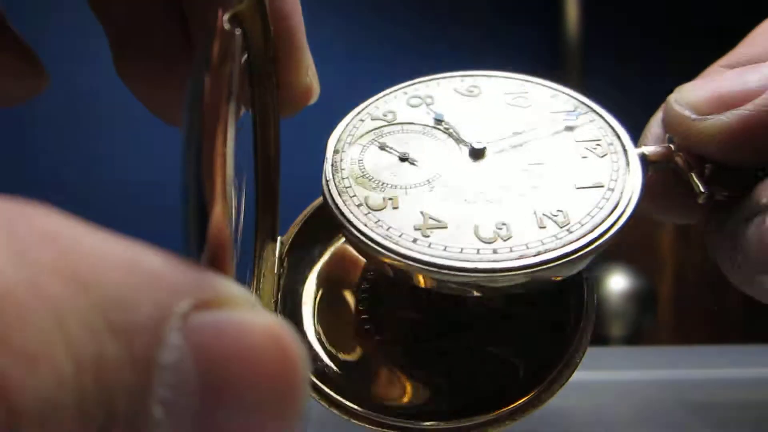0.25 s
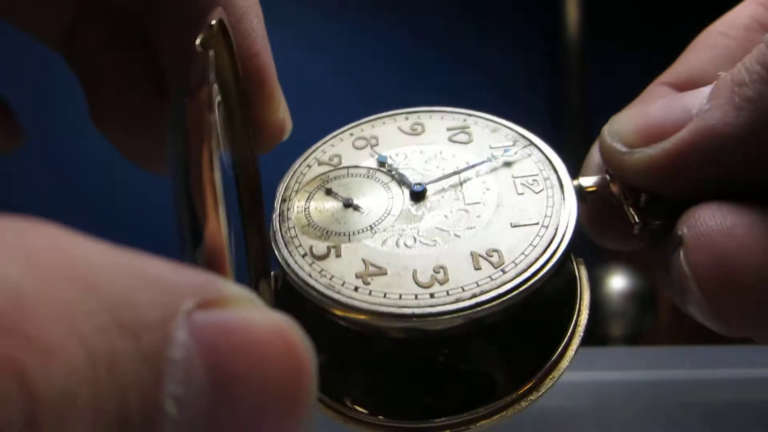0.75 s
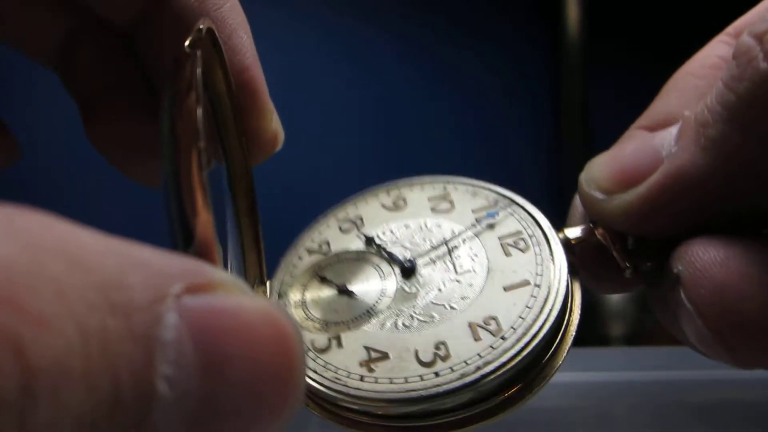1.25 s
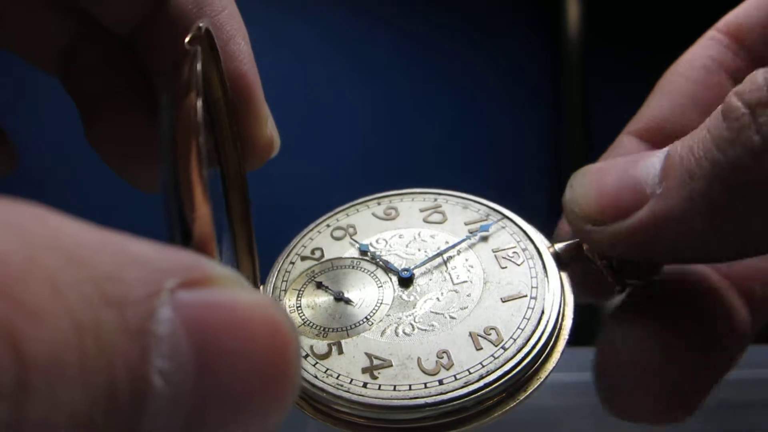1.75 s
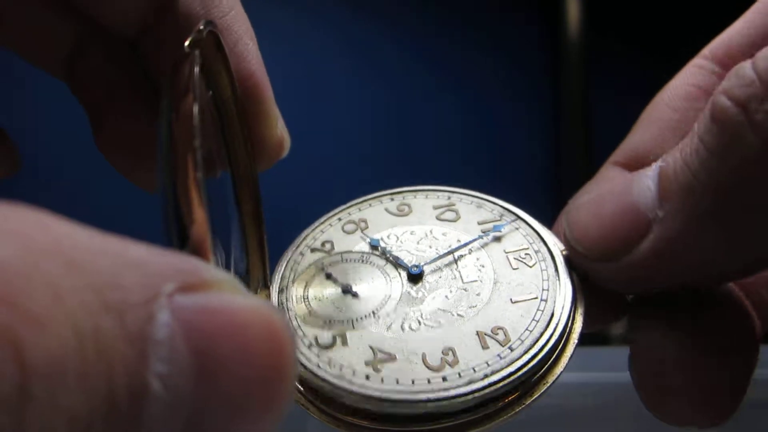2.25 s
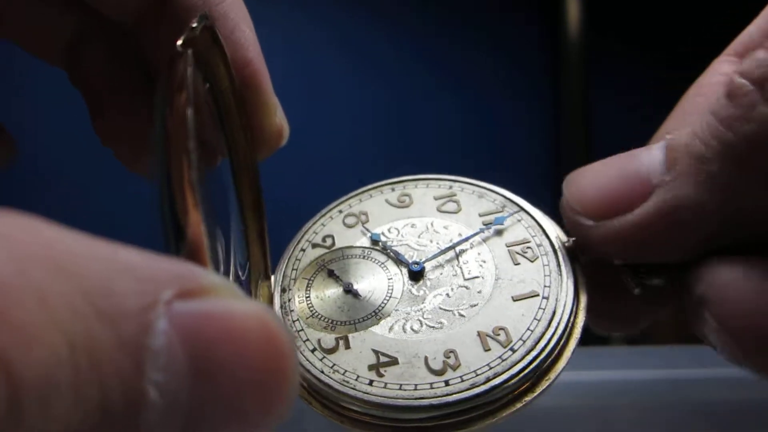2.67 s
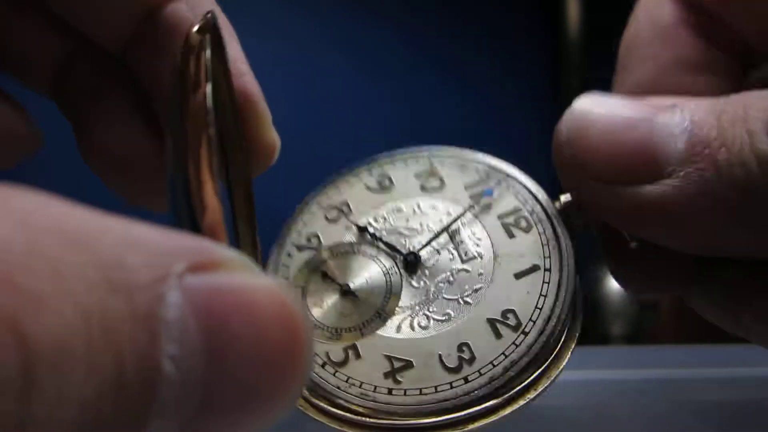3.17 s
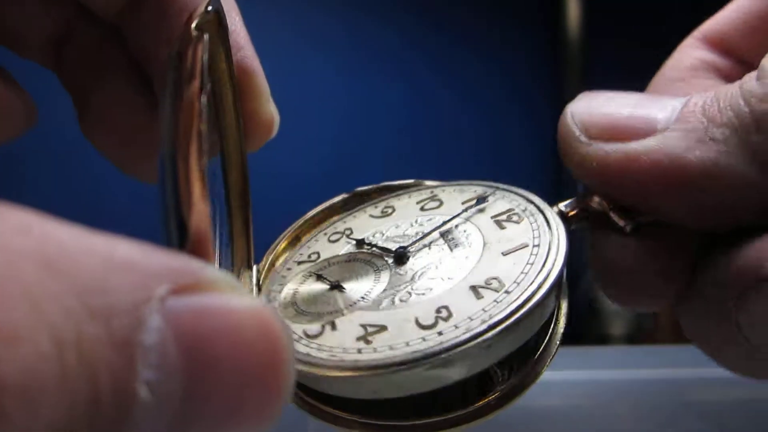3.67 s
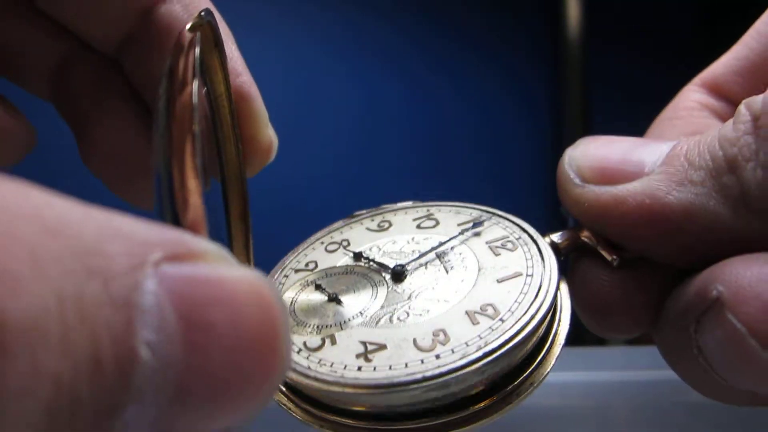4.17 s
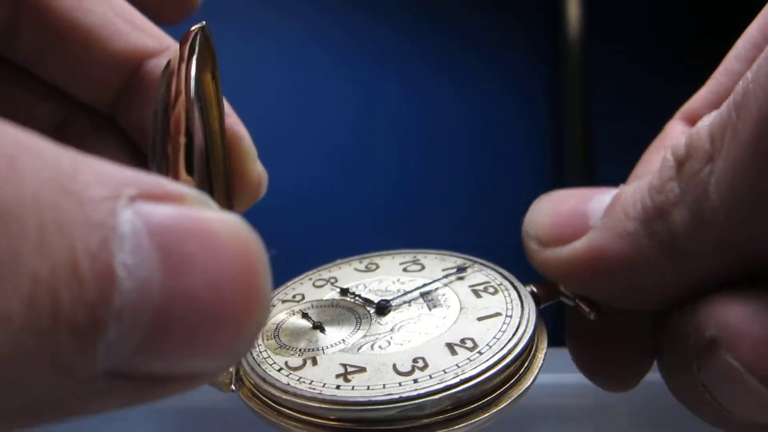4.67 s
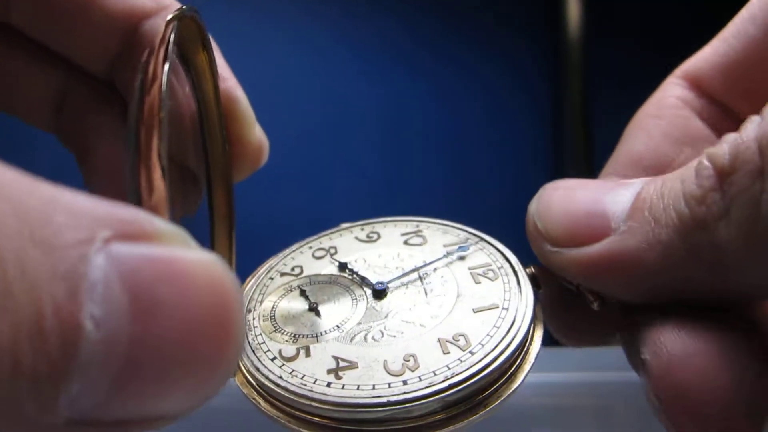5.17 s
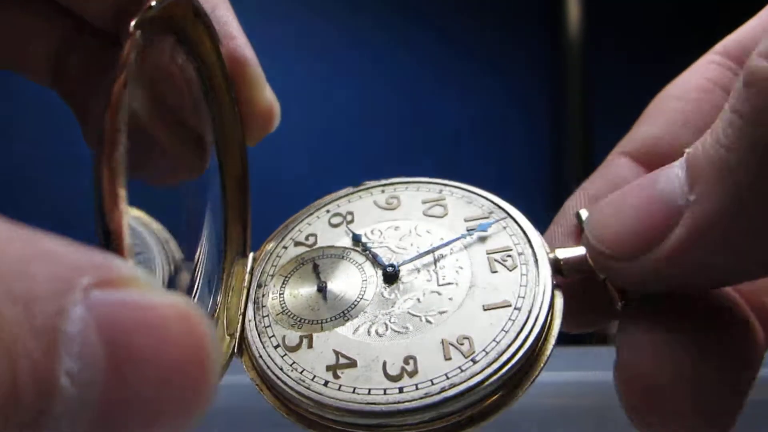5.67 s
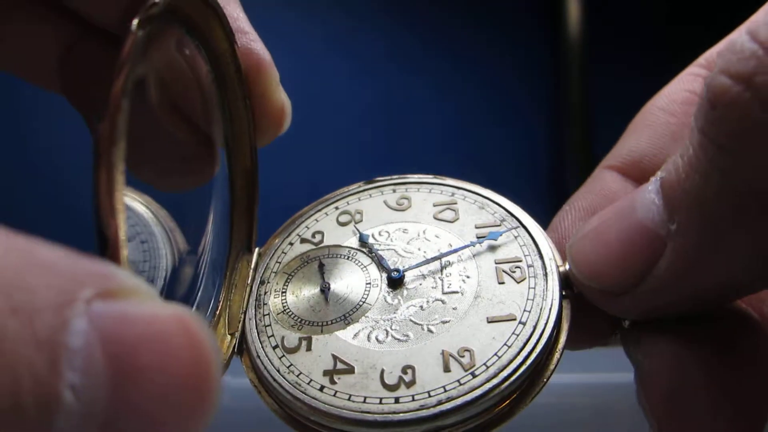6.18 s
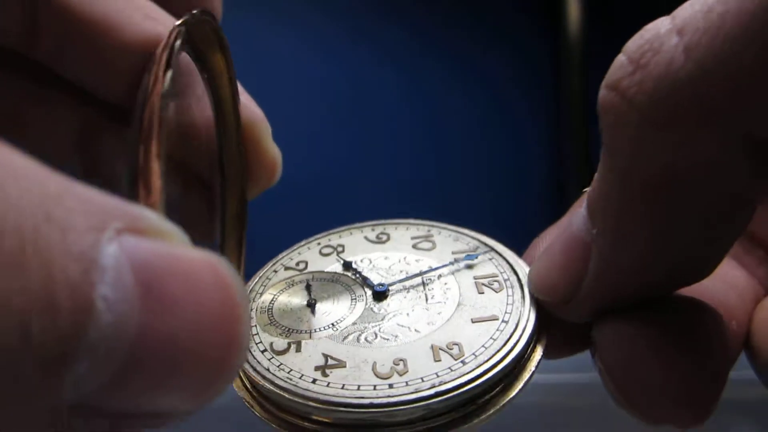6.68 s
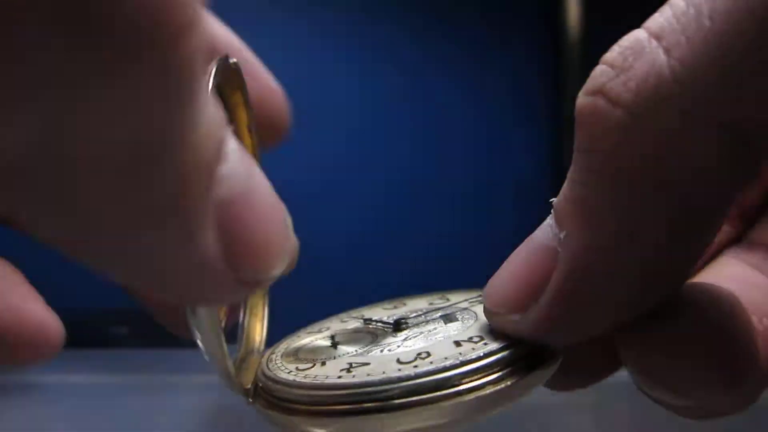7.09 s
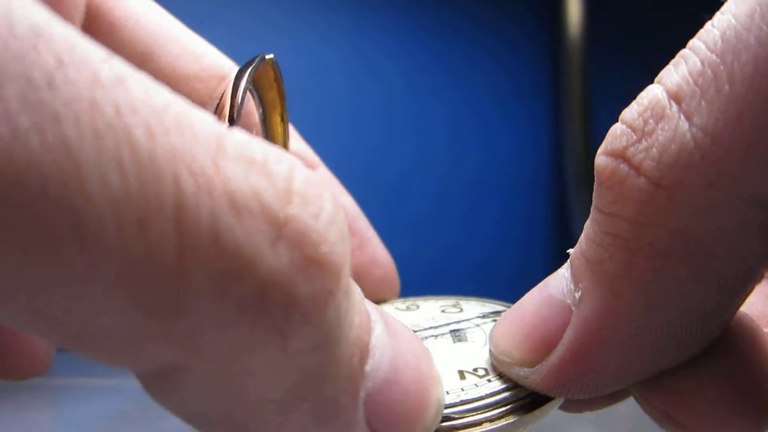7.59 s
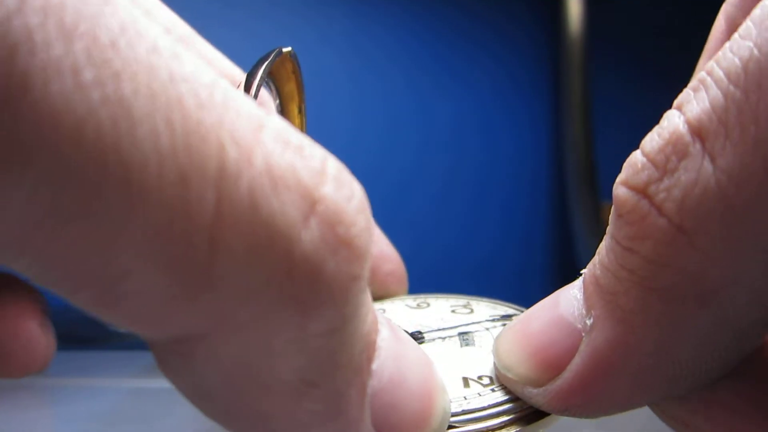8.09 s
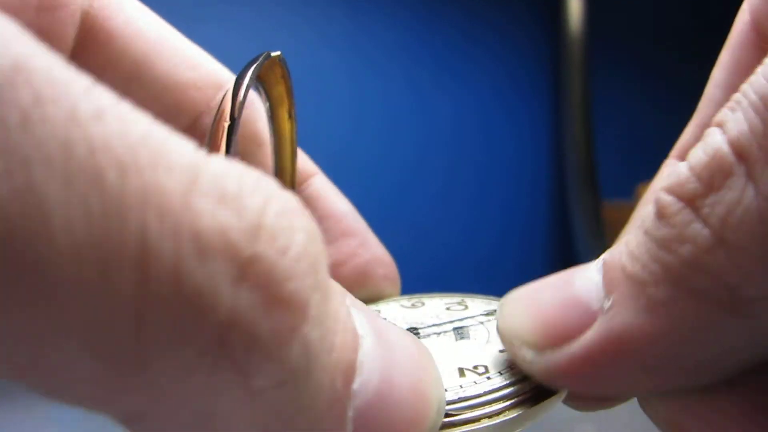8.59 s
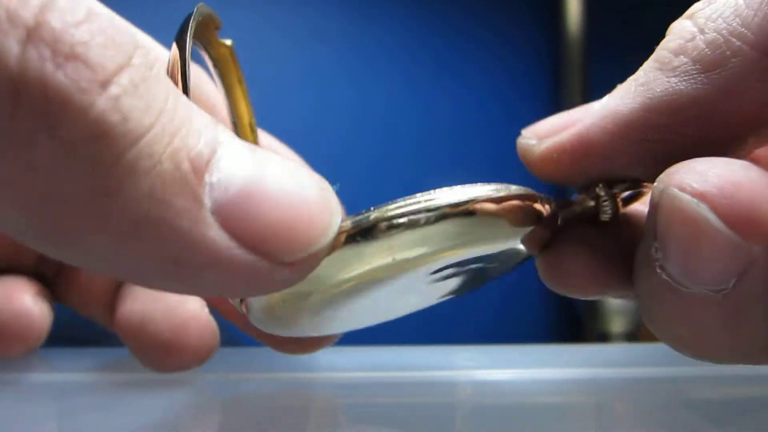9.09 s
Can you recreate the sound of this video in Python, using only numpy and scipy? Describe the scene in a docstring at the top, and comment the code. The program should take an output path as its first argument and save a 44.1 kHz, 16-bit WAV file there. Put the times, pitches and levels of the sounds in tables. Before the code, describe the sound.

A pocket watch ticks fast and faintly while its movement clinks, scrapes and snaps into a metal case, close up in a quiet room.

```python
"""A ticking watch movement knocks and scrapes on the rim of its open metal case as fingers lower it in.
Close to a camera microphone in a quiet room: blows ring modes of table, case, rim and lid, with noise cracks;
slides are dense tiny slips on the same metal, ticks are bursts of small impacts, skin rubs as shaped noise.
Short reflections, room air, rumble, hum and faint whines lie around it, with one thin squeak late on.
The camera ducks its gain after loud blows and twice falls nearly silent around a small dull click."""
import sys
import numpy as np
from scipy import signal
from scipy.fft import rfft, irfft
from scipy.io import wavfile
from scipy.ndimage import uniform_filter1d

SR = 44100
rng = np.random.default_rng(int(sys.argv[2]) if len(sys.argv) > 2 else 0)


def store_wav(level_fs):
    """Save 16-bit WAV to argv[1]."""
    pcm = np.round(np.clip(np.atleast_2d(level_fs), -1, 1) * 32767)
    wavfile.write(sys.argv[1], SR, pcm.T.astype(np.int16))


N = 411453

# ringing modes of the table top: (f/Hz, level/dB, t60/s)
TABLE_MODES = [(152, -10, 0.037), (184.4, -7, 0.06), (240.3, 4.5, 0.036), (372, -2.5, .04)]
# ringing modes of the metal case: (f/Hz, level/dB, t60/s)
CASE_MODES = [(488, -3.5, 0.01), (588, 3, 0.021), (710.4, 1.5, 0.032), (919, 6.5, 0.015),
              (1084, 9.5, 0.012), (1254, 3.5, 0.014), (1584, -6, 0.023)]
# ringing modes of the case rim: (f/Hz, level/dB, t60/s)
RIM_MODES = [(2131, 1.5, 0.011), (2330, 1.5, 0.012), (2644, -1, 0.011), (3450, -0.5, 0.014),
             (3604, -3.5, 0.017), (4040, -0.5, 0.01), (4830, 2.5, 0.0058)]
# highest ringing modes, at the edge of the rim: (f/Hz, level/dB, t60/s)
EDGE_MODES = [(5920, 1, 0.0031), (6680, 1.5, 0.013), (8380, -3, 0.017), (11420, -5, 0.011),
              (12500, -7, 0.01), (14350, -12.5, 0.0067)]
# ringing modes of the loosely held lid: (f/Hz, level/dB, t60/s)
LID_MODES = [(2190, -5, .09), (3200, -2, .08), (3540, 0, .06), (3960, -3, .09), (4130, -1, .09),
             (5900, -9, .04), (6790, -1, .13), (8570, -6, .045), (10560, -8, .13), (14900, -14, .09)]


def gain_of(db):
    """Decibels to gain."""
    return 10 ** (np.asarray(db) / 20)


def evened(x):
    """Scales to rms 1."""
    return x / np.sqrt(np.mean(x ** 2) + 1e-20)


def read(points, hz):
    """A table over frequency, read on a log frequency axis."""
    f, value = np.transpose(points)
    return np.interp(np.log(hz + 1), np.log(f + 1), value)


def follow(points, s):
    """A table over time, read at s seconds."""
    return np.interp(s, *np.transpose(points))


def add(mix, s, sound):
    """Mixes a sound in at s seconds."""
    part = mix[round(s * SR):][:len(sound)]
    part += sound[:len(part)]


def noise(spectrum, patchy_db=0.):
    """Noise of rms 1 with a given spectrum and patches that drift over time and frequency."""
    frames, hz = N // 256 + 5, np.fft.rfftfreq(1024, 1 / SR)
    real, imaginary, patches = rng.standard_normal((frames, 513, 3)).T
    patches = uniform_filter1d(patches, size=10, axis=0)
    patches = evened(uniform_filter1d(patches, size=12, axis=1))
    level_db = read(spectrum, hz)[:, None] + patchy_db * patches
    z = (real + 1j * imaginary) * gain_of(level_db)
    return evened(signal.istft(z, nperseg=1024, noverlap=768)[1][:N])


def band_noise(band_hz):
    """Noise of rms 1 between two frequencies."""
    band = signal.butter(2, band_hz, "band", fs=SR, output="sos")
    return evened(signal.sosfilt(band, rng.standard_normal(N)))


def puff(spectrum, t60, rise_s=0.000074):
    """A dying burst of coloured noise, of peak 1."""
    t = np.arange(4096) / SR
    colour = gain_of(read(spectrum + [(SR / 2, -60)], np.fft.rfftfreq(4096, 1 / SR)))
    x = irfft(rfft(rng.standard_normal(4096)) * colour)
    x *= gain_of(-60 * t / t60) * (1 - np.exp(-t / rise_s))
    return x / abs(x).max()


def ring(modes, favoured_hz=None, focus=.3, spread_db=3.5, rise_s=0.00076, most_db=11.5):
    """Dying modes of peak 1; the point of contact favours those near one pitch."""
    hz, db, t60 = np.transpose(modes)[:, :, None]
    t = np.arange(round(min(t60.max(), .2) * SR)) / SR
    level_chance, pitch_chance = rng.standard_normal((2, len(modes), 1))
    if favoured_hz:
        # 20 dB lost per `focus` of log-pitch distance, up to most_db
        db = db - np.minimum(20 * abs(np.log(hz / favoured_hz)) / focus, most_db)
    level = gain_of(db + spread_db * level_chance - 60 * t / t60)
    tones = level * np.sin(2 * np.pi * hz * (1 + 0.0049 * pitch_chance) * t)
    sound = tones.sum(axis=0) * (1 - np.exp(-t / rise_s))
    return sound / abs(sound).max()


def strokes(rows):
    """Pressure and brightness gains of strokes that rise, swell or fade evenly, and fall; one held control."""
    out = np.zeros((3, N))
    edge_s = 0.021  # rise and fall, shorter only when the stroke is too brief
    for s, length_s, pressure_db, change_db, bright_db, control, *_ in rows:
        t = np.arange(0, length_s, 1 / SR)
        edge = signal.windows.tukey(len(t), min(1, 2 * edge_s / length_s))
        pressure = gain_of(pressure_db + change_db * t / length_s) * edge
        add(out[0], s, pressure)
        add(out[1], s, gain_of(bright_db) * pressure)
        out[2, round(s * SR):] = control
    return out


def room():
    """Nearly steady room air, a wandering low rumble and hum, a fuzzy drone and the camera's faint whines."""
    # spectrum of the room air: (f/Hz, relative level per Hz/dB)
    air = [(12, -38.5), (20, -14.5), (130, -2), (182, -5.5), (284, -9), (920, -14.5), (1090, -10.5),
           (1700, -20), (7270, -27.5), (15800, -34.5)]
    # steep upper band limit of the hiss: (f/Hz, relative level per Hz/dB)
    hiss_limit = [(16050, -38), (16250, -62)]
    # wandering low rumble: (t/s, level/dB)
    rumble_db = [(0, -60.5), (2.4, -56.5), (3.3, -65), (4.2, -58), (4.6, -67), (5.2, -59), (5.9, -73.5),
                 (7, -62), (8.3, -69.5), (8.8, -59), (9.33, -66)]
    # wandering hum: (t/s, level/dB)
    hum_db = [(0, -65), (1.5, -63), (2.3, -65), (2.9, -60), (3.5, -73), (4.3, -61.5), (5.25, -61),
              (5.7, -66.5), (6.9, -58), (7.9, -59.5), (8.37, -54), (8.8, -57.5), (9.33, -58.5)]
    # one fuzzy tone in the room: (f/Hz, width/Hz, level/dB)
    drone = (1085, 78, -70.5)
    # steady tones of the camera: (f/Hz, level/dB)
    whines = [(7854, -83), (7881, -76)]
    t = np.arange(N) / SR
    out = gain_of(-54) * noise(air + hiss_limit, patchy_db=0.23)
    out += gain_of(follow(rumble_db, t)) * band_noise([45, 95])
    out += gain_of(follow(hum_db, t)) * band_noise([110, 150])
    hz, width_hz, db = drone
    narrow = signal.iirpeak(hz, hz / width_hz, SR)
    out += gain_of(db) * evened(signal.lfilter(*narrow, rng.standard_normal(N)))
    for hz, db in whines:
        out += gain_of(db) * np.sqrt(2) * np.sin(2 * np.pi * (hz * t + rng.random()))
    return out


def burst(hz, length_s, count):
    """A few tiny escapement impacts in quick succession, the first at once and strongest."""
    # ringing modes of the escapement: (f/Hz, level/dB, t60/s)
    escapement = [(7100, -7.5, 0.0049), (8200, 11, 0.0069), (9300, -11.5, 0.019), (9300, 3, 0.011),
                  (10500, 4, 0.01), (11300, 1.5, 0.0068), (14080, 4.5, 0.0055), (14420, -5, 0.0048),
                  (16110, -4, 0.0065)]
    # noise of one impact: (f/Hz, relative level per Hz/dB)
    hiss = [(5000, -7.5), (8000, 0.5), (11000, -9.5), (15000, 4), (16500, -15)]
    at, size = rng.random((2, count))
    train = np.zeros(round(length_s * SR) + 2)
    places = np.round((np.arange(count) + at) / count * length_s * SR).astype(int)
    train[places] = 0.39 + 0.31 * size
    train[0] = 1
    impact = gain_of(-1.0) * puff(hiss, t60=0.0084)[:800]
    add(impact, 0, ring(escapement, hz, focus=0.49))
    sound = np.convolve(train, impact)
    return sound / abs(sound).max()


def ticks():
    """About five beats a second, strong and weak in turn; unlock, impulse and drop crowd into milliseconds."""
    # lag of the beat, which shifts while the movement is tilted: (t/s, lag/s)
    beat_lag = [(0, .0612), (1.7, .0635), (3, .0695), (4.8, .0705), (5.4, .0675), (6.2, .0695),
                (8.4, .0688), (9.3, .0655)]
    # the two beats in turn: (level/dB, middle of the favoured f/Hz, length/s, late/s)
    tick_tock = [(-39.5, 13500, 0.0058, 0), (-47, 10500, 0.0057, .0015)]
    spread_db, spread_octaves = 1, 0.26
    out = np.zeros(N)
    starts = np.arange(0, N / SR, .2)
    chance = rng.standard_normal((len(starts), 2))
    for k, s in enumerate(starts + follow(beat_lag, starts)):
        db, hz, length_s, late_s = tick_tock[k % 2]
        beat = burst(hz * 2 ** (spread_octaves * chance[k, 0]), length_s, count=4)
        add(out, s + late_s, gain_of(db + spread_db * chance[k, 1]) * beat)
    return out


def echo(x):
    """Short dense reflections from table and nearby walls, each frequency dying at its own rate."""
    # decay of the reflections: (f/Hz, t60/s)
    decay = [(200, 0.26), (1000, 0.2), (4000, 0.083), (12000, 0.17)]
    hz, t, z = signal.stft(rng.standard_normal(SR // 4), SR, nperseg=128)
    dying = gain_of(-60 * t / read(decay, hz)[:, None])
    tail = signal.istft(z * dying, SR, nperseg=128)[1]
    tail = np.pad(tail, (round(0.0029 * SR), 0))  # s before the first reflection
    return signal.oaconvolve(x, tail / np.linalg.norm(tail))[:N]


def knocks():
    """Each blow rings table, case, rim, edge and the loosely held lid by its own amounts."""
    # blows of the movement on the case: (t/s, table thud level/dB, case knock level/dB, rim clack level/dB,
    # snap level/dB, favoured case f/Hz, favoured rim and lid f/Hz)
    blows = [(0.9669, -24, -13, -9, -21, 1090, 4020), (1.022, -60, -32, -46, -61, 704, 3450),
             (1.052, -55, -32, -45, -62, 645, 3540), (1.0675, -45, -27, -26, -39, 704, 3600),
             (1.149, -30.5, -27, -22, -35, 714, 3600), (1.1645, -44, -40, -43, -52, 1070, 4100),
             (1.1761, -50, -27, -27, -49, 1100, 3470), (1.185, -36, -23, -30, -50, 1100, 4090),
             (1.1977, -41, -30, -48, -48, 1130, 4170), (1.214, -50, -31, -39, -56, 610, 3430),
             (1.2272, -42, -32, -36, -48, 1120, 2330), (1.241, -35, -35, -47, -53, 1080, 2300),
             (1.248, -43, -32, -30, -49, 660, 2140), (1.255, -54, -23, -38, -44, 940, 3500),
             (1.2653, -21, -12, -22.5, -19.5, 870, 3740), (1.2873, -37, -24.5, -33.5, -35, 1250, 2280),
             (1.346, -42, -40, -64, -58, 826, 2430), (1.4398, -29, -25.5, -48, -54, 690, 1910),
             (1.544, -30, -23, -44, -46, 950, 3500), (1.548, -19, -12, -34, -31, 970, 3570),
             (1.5617, -41, -13.5, -31, -39, 760, 2630), (1.7668, -39, -18, -37, -50, 480, 2310),
             (1.7795, -65, -23.5, -30.5, -31.5, 1660, 2680), (1.792, -58, -36, -38, -50, 1640, 1910),
             (1.812, -51, -44, -44, -55, 1210, 2540), (1.8409, -77, -27.5, -35, -27, 1180, 2620),
             (1.845, -67, -51, -25, -23.5, 1300, 2590), (2.01, -64, -38, -49, -58, 890, 2350),
             (2.295, -35.5, -39, -54, -59, 790, 2940), (2.4277, -27.5, -39, -47, -57, 440, 1970),
             (2.4328, -30.5, -10, -27, -30, 547, 3630), (2.4483, -27.5, -26, -31, -40, 740, 3340),
             (2.455, -35, -39, -31.5, -48, 430, 3450), (2.5668, -44, -35, -36.5, -38, 660, 2720),
             (3.04, -51, -44.5, -46.5, -50, 660, 2850), (3.1455, -51, -28, -20, -22, 1290, 3200),
             (3.1501, -24.5, -26, -12.5, -9, 1350, 4050), (3.1578, -10, -4.5, -5, -12.5, 1110, 3300),
             (3.164, -19, -20, -26, -30, 1000, 4090), (3.2766, -45, -25.5, -35.5, -39, 1020, 2510),
             (3.2909, -47, -38, -43, -46, 1010, 3270), (3.316, -53, -18.5, -56, -42, 980, 3550),
             (3.3278, -25.5, -17.5, -23.5, -24.5, 554, 3740), (3.358, -56, -34.5, -65, -35, 1230, 2340),
             (3.439, -46, -40.5, -45, -48, 610, 2830), (3.536, -66, -37, -52, -57, 1230, 4070),
             (3.573, -46, -36.5, -77, -64, 520, 3500), (3.7567, -33, -16.5, -35, -35.5, 550, 3970),
             (3.774, -47, -34, -44, -44, 945, 3550), (3.7867, -46, -36, -53, -52, 660, 1910),
             (3.8036, -48, -18.5, -49, -39.5, 776, 2090), (3.902, -48, -40, -50, -61, 690, 2060),
             (3.941, -41, -29.5, -49, -44.5, 980, 3540), (4.0141, -46, -45, -49, -51, 1130, 3670),
             (4.025, -49, -40, -40.5, -48, 680, 3600), (4.0582, -56, -34.5, -55, -57, 1170, 2360),
             (4.1175, -32, -27.5, -39, -40, 557, 4040), (4.1325, -37, -19, -31, -38.5, 510, 3880),
             (4.1954, -28, -23.5, -37.5, -36, 540, 3350), (4.256, -34.5, -46, -60, -57, 540, 1960),
             (4.3315, -38, -38, -44, -51, 1220, 3640), (4.3525, -22, -24, -44, -56, 470, 2320),
             (4.42, -48, -39, -60, -56, 610, 1940), (5.028, -51, -41.5, -47.5, -53, 660, 2840),
             (5.142, -49, -49, -45.5, -52, 560, 1910), (5.7013, -60, -37, -48, -58, 860, 3520),
             (6.2617, -38, -12.5, -16, -22, 400, 3130), (6.2649, -7, -7.5, -10, -12, 406, 2420),
             (6.2842, -43, -39, -29, -50, 520, 3260), (6.455, -58, -45, -47, -62, 800, 2500),
             (6.776, -23, -22, -46, -41.5, 432, 1928), (6.8167, -26, -32.5, -47, -55, 430, 2130),
             (6.919, -31, -21, -27.5, -34.5, 1160, 2680), (6.924, -18, -27, -29.5, -31.5, 556, 1930),
             (7.188, -35.5, -42, -42, -48, 516, 3170), (7.2316, -44, -34.5, -46, -51, 800, 2360),
             (7.2473, -25.5, -27, -51, -59, 480, 1900), (7.5188, -15, -5.5, -10.5, -13.5, 1250, 2920),
             (7.522, -41, -13, -31, -33, 714, 2700), (7.6635, -25.5, -4, -12.5, -25.5, 1005, 3600),
             (7.823, -56, -42, -62, -55, 590, 1900), (8.2845, -35, -26, -44.5, -55, 500, 1910),
             (8.4003, -39, -35, -64, -61, 480, 2010), (8.5391, -27.5, -18, -32, -42, 477, 1900),
             (8.5479, -43, -26, -35, -38.5, 428, 1900), (8.6163, -50, -38, -46, -37.5, 1340, 3530),
             (8.654, -35.5, -46, -49, -42, 520, 3880), (8.691, -36.5, -42, -65, -60, 537, 2700)]
    # pitch a thud favours, moving as the hands press case and table: (t/s, f/Hz)
    thud_hz = [(0, 258), (6.3, 245), (7.25, 250), (7.52, 157), (7.66, 230), (8.28, 375), (8.55, 375),
               (8.65, 150)]
    # grip on the lid: (t/s, free ring level against the rim clack/dB, pitch left most free f/Hz)
    lid_free = [(0.97, -23, 4000), (1.15, -17, 3560), (1.26, -10, 6700), (1.55, -14.5, 3620),
                (2.5, -25.5, 3300), (3.15, -16, 4120), (3.35, -8, 4000), (4.2, -26, 4000),
                (6.26, -15.5, 6790), (6.9, -27, 3320), (7.6, -37, 3300), (8.6, -22, 3300)]
    # dull part of a blow: (f/Hz, relative level per Hz/dB)
    crack = [(300, -6), (1200, 1.5), (2500, -2.5), (5000, -14)]
    # sharp part of a blow: (f/Hz, relative level per Hz/dB)
    snap = [(3500, -24.5), (5500, 3), (9000, -2), (13000, -8), (16500, -18)]
    out, thuds = np.zeros((2, N))
    grip_s, *grip = np.transpose(lid_free)
    for s, thud_db, knock_db, clack_db, snap_db, case_hz, rim_hz in blows:
        free_db, lid_hz = (np.interp(s, grip_s, v) for v in grip)
        ring_db = clack_db + free_db
        # the table needs a moment to move
        thud = ring(TABLE_MODES, follow(thud_hz, s), focus=0.69, rise_s=0.0016)
        add(thuds, s, -gain_of(thud_db) * thud)
        add(out, s, gain_of(knock_db) * ring(CASE_MODES, case_hz, focus=0.78))
        add(out, s, gain_of(clack_db) * ring(RIM_MODES, rim_hz, focus=0.32))
        add(out, s, gain_of(clack_db - 1.0) * puff(crack, t60=0.013))
        add(out, s, gain_of(snap_db) * puff(snap, t60=0.013))
        add(out, s, gain_of(snap_db - 4.5) * ring(EDGE_MODES, rise_s=.0001))
        # the lid rings where the grip leaves it free, and near the pitch of the contact
        free = ring(LID_MODES, lid_hz, spread_db=2.5, focus=.25, most_db=14.)
        add(out, s, gain_of(ring_db) * free)
        touched = ring(LID_MODES, rim_hz, spread_db=2.5, focus=.15, most_db=24.)
        add(out, s, gain_of(ring_db - 4.5) * touched)
    # a small table top radiates no deep bass
    return out + signal.sosfilt(signal.butter(2, 85., "high", fs=SR, output="sos"), thuds)


def scrapes():
    """Dense uneven slips, each a tiny blow on the same table, case, rim and lid."""
    # metal sliding on the rim: (t/s, length/s, pressure level/dB, change over the stroke/dB,
    # brightness against pressure/dB, favoured case f/Hz, favoured rim and lid f/Hz)
    slides = [(1.01, 0.051, -36, -14, -11, 660, 3560), (1.127, 0.082, -42, 5, -6, 1120, 3580),
              (1.2, 0.064, -39.5, 5, -11.5, 1120, 4000), (1.248, .055, -35, -3, -18, 1110, 4000),
              (2.429, 0.047, -39, -20, 3, 650, 3300), (3.141, 0.018, -37.5, 13, 16, 1250, 3600),
              (3.271, 0.051, -32.5, -11, -8.5, 1050, 5900), (3.342, .06, -35, 1, -14.5, 1240, 4000),
              (3.516, 0.047, -44.5, -11, -6, 1100, 7500), (3.65, .02, -60, -3, 5, 1100, 4200),
              (3.695, 0.024, -61, 0, 8, 1100, 4200), (3.767, 0.061, -37.5, -11, -14, 700, 4300),
              (3.942, 0.1, -52, 11, -12, 940, 3800), (4.15, .16, -49, -3, -22, 480, 2190),
              (4.32, 0.04, -31, -16, -17, 474, 2190), (4.361, .04, -47.5, 7, -22, 486, 2190),
              (6.156, 0.061, -50, -10, -1.5, 1000, 3200)]
    happens = rng.random(N) < 1500 / SR  # about 1500 slips a second
    unevenness = gain_of(3.5 * np.minimum(rng.exponential(1, N), 4))
    slips = rng.standard_normal((4, N)) * unevenness * happens
    levels_db = (-10.5, -2.0, -4.0, -8.5)  # table, case, rim with edge, lid
    out = np.zeros(N)
    for row in slides:
        s, length_s, *_, case_hz, lid_hz = row
        span = slice(round(s * SR), round((s + length_s) * SR) + 1)
        pressure, bright = strokes([row])[:2, span]
        bodies = (ring(TABLE_MODES),
                  ring(CASE_MODES, case_hz, focus=1.0),
                  ring(RIM_MODES + EDGE_MODES, lid_hz, focus=2.6),
                  ring(LID_MODES, lid_hz, focus=.35, most_db=11.))
        drives = (pressure, pressure, bright, bright)
        for x, drive, db, body in zip(slips, drives, levels_db, bodies):
            rung = signal.oaconvolve(evened(x[span]) * drive, body / np.linalg.norm(body))
            add(out, s, gain_of(db) * rung)
    return out


def rubs():
    """Skin friction: a low pressed rub or a lighter rustle, and a hiss above it."""
    # skin on case and table: (t/s, length/s, pressure level/dB, change over the stroke/dB,
    # brightness against pressure/dB, share of the lighter fingertip rustle/0-1)
    skin_strokes = [(2.26, 0.065, -57, 9, -18, .4), (5.58, 0.061, -56, -0.5, 8.5, .4),
                    (5.7, 0.094, -49.5, -13, 5.5, 0.97), (5.7, .05, -56, -4, -20, 1),
                    (5.8, .22, -58, 2.5, -1.5, .95), (6.05, .2, -59, 6.5, -4.5, 0.5),
                    (7.1, 0.041, -54, -15, -5, .6), (7.17, 0.05, -45.5, -8, -5, 0.1),
                    (7.52, 0.1, -44, -12, -3, 0.6), (8.09, 0.2, -56, 3, -17.5, 0.46),
                    (8.29, 0.18, -50, -7, -22, 0.2), (8.57, 0.13, -61.5, 14.5, -2, 0.4),
                    (8.735, 0.18, -47, -8, -8.5, 0.05), (8.89, 0.091, -52, -14, -9, 0.1)]
    # pressed pad of the finger: (f/Hz, relative level per Hz/dB)
    pad = [(100, 3), (250, 6.5), (450, 9.5), (700, -15), (1200, -45)]
    # lighter fingertip rustle: (f/Hz, relative level per Hz/dB)
    fingertip = [(300, 1.5), (600, 4), (850, 18), (1250, -0.5), (1900, -18)]
    # hiss of the skin: (f/Hz, relative level per Hz/dB)
    skin_hiss = [(1500, -1.5), (2500, -6.5), (4500, -10.5), (7000, -20), (12000, -35.5), (16000, -60)]
    pressure, bright, light = strokes(skin_strokes)
    light = np.clip(light, 0, 1)
    patchy_db = 3.
    pressed = np.sqrt(1 - light) * noise(pad, patchy_db)
    rustle = np.sqrt(light) * noise(fingertip, patchy_db)
    return pressure * (pressed + rustle) + bright * noise(skin_hiss, patchy_db)


def squeak():
    """One thin tone that holds, then sags in pitch and level."""
    start_s, hold_s, sag_s = 8.175, .075, 0.086
    start_hz, sag_hz, start_db, fade_db = 11950, -900, -73, -8
    t = np.arange(0, hold_s + sag_s, 1 / SR)
    sag = np.clip((t - hold_s) / sag_s, 0, 1)
    out = np.zeros(N)
    tone = np.sqrt(2) * np.sin(2 * np.pi * np.cumsum(start_hz + sag_hz * sag) / SR)
    level = gain_of(start_db + fade_db * np.sqrt(sag)) * signal.windows.tukey(len(t), .2)
    add(out, start_s, level * tone)
    return out


def scene():
    """Everything on the table, the reflections of metal and ticks, and the room."""
    near = knocks() + scrapes() + ticks()
    return (near + gain_of(-17.0) * echo(near) + rubs() + squeak() + room())[None]


def ducked(x):
    """Gain control that dips just after loud blows and creeps back."""
    power_db = 10 * np.log10(abs(uniform_filter1d(x ** 2, size=2000)) + 1e-12)
    fall = np.arange(N) * 18.3 / SR  # the held level sinks 18.3 dB a second
    held_db = np.maximum.accumulate(power_db + fall) - fall
    over_db = np.maximum(held_db + 29, 0)  # above a threshold of -29 dB
    late_db = np.pad(uniform_filter1d(over_db, size=1200), (1600, 0))[:N]  # reacts after the blow has passed
    return x / gain_of(0.41 * late_db)


def silences():
    """Gain that drops by 30 dB twice, and the dull clicks and closing low pop heard there."""
    # silences: (from t/s, to t/s, click t/s)
    gaps = [(.2378, .3022, .2478), (7.4548, 7.5172, 7.4685)]
    # spectrum of the dull click: (f/Hz, relative level per Hz/dB)
    dull = [(300, -22), (1000, 8.5), (2000, -2), (4000, -1), (6500, -6), (10000, -4), (13000, -7),
            (16000, -32)]
    passing, clicks = np.ones(N), np.zeros(N)
    for start, end, s in gaps:
        passing[round(start * SR):round(end * SR)] = gain_of(-30)
        add(clicks, s, gain_of(-51) * puff(dull, t60=.04))
        add(clicks, s + 0.0028, gain_of(-41.0) * puff(dull, t60=0.027, rise_s=0.00025))
    # a low pop as the last silence ends
    t = np.arange(2000) / SR
    pop = np.exp(-t / 0.012) * (1 - np.exp(-t / 0.0024))
    add(clicks, gaps[-1][1], -gain_of(-28) * pop)
    return uniform_filter1d(passing, size=20), clicks


def record(dry):
    """The camera's gain control and silences, then soft overload and an upper band limit."""
    out = ducked(dry[0])
    passing, clicks = silences()
    out = np.tanh((out * passing + clicks) / 1.045) * 0.87
    band_limit = signal.firwin(255, 16800, window=("kaiser", 9), fs=SR)  # Hz
    return signal.oaconvolve(out, band_limit, "same")[None]


dry = scene()
out = record(dry)
store_wav(out)
```